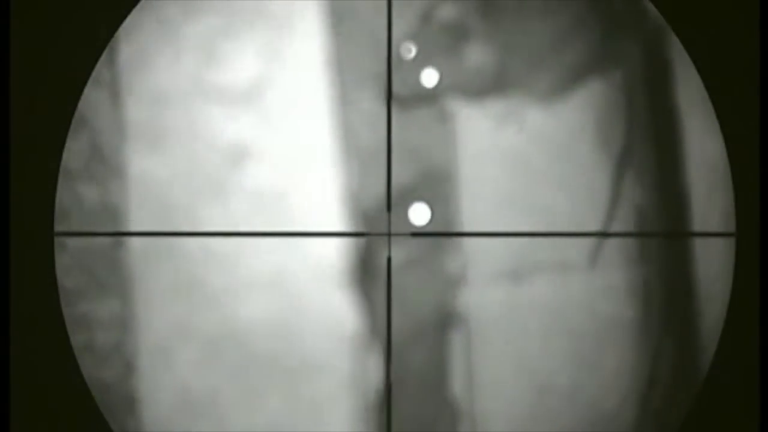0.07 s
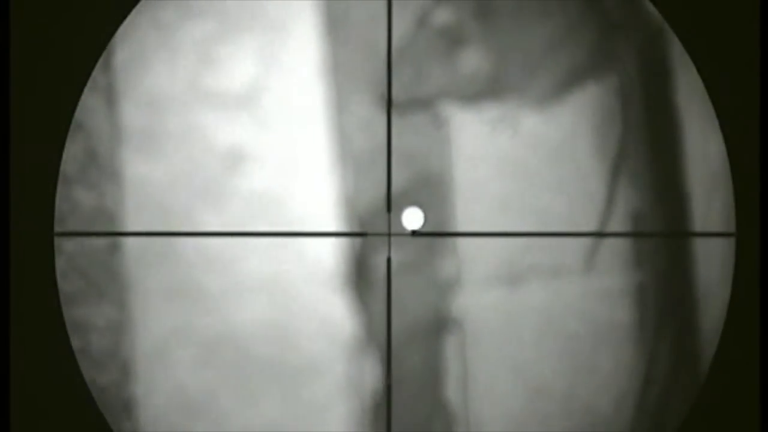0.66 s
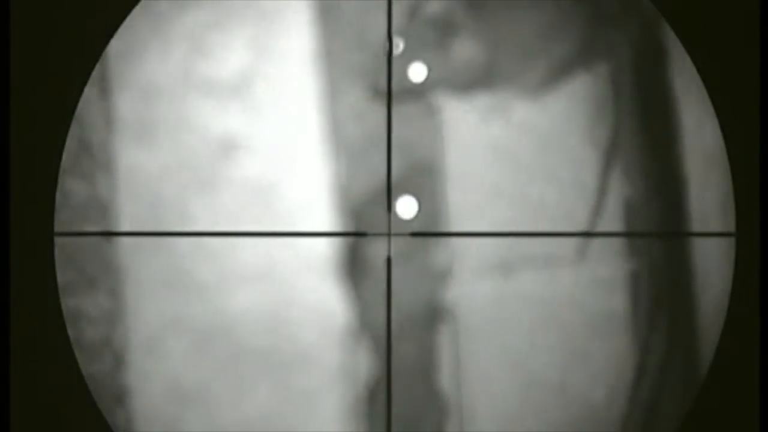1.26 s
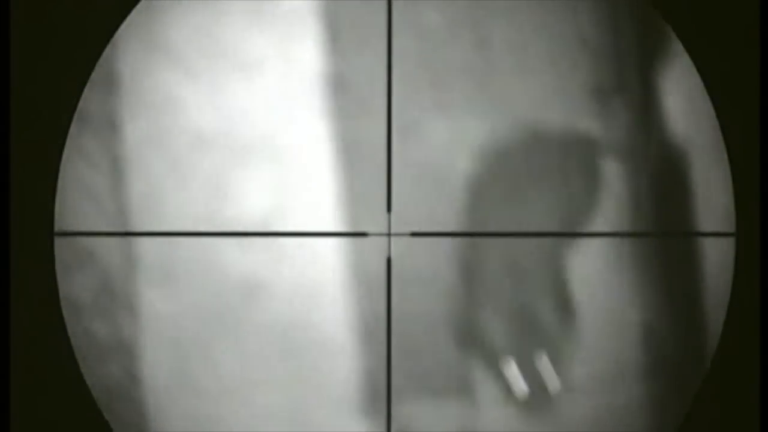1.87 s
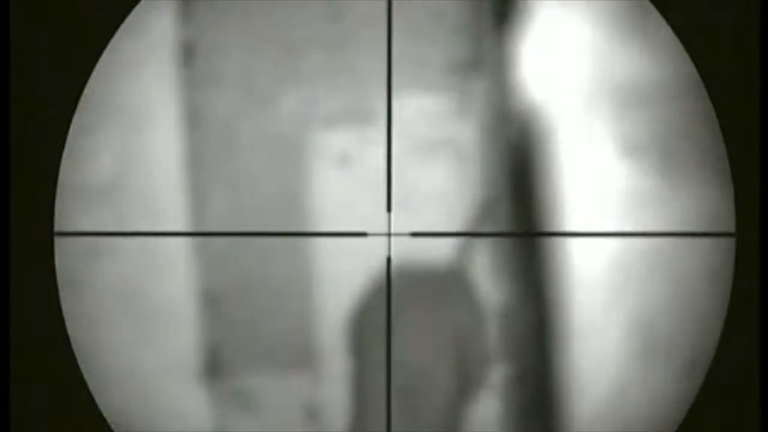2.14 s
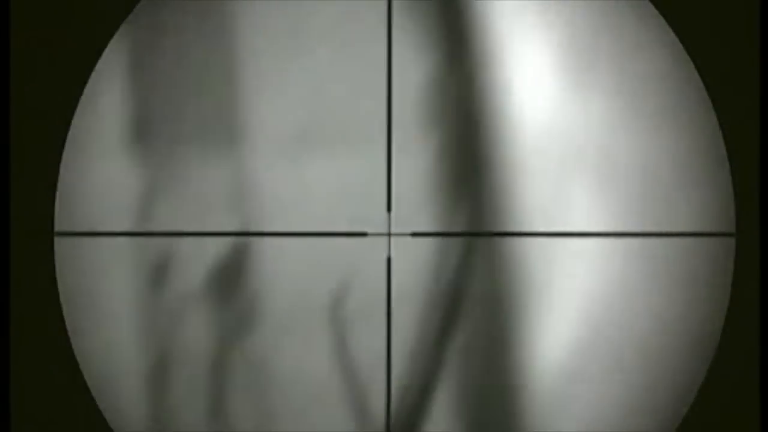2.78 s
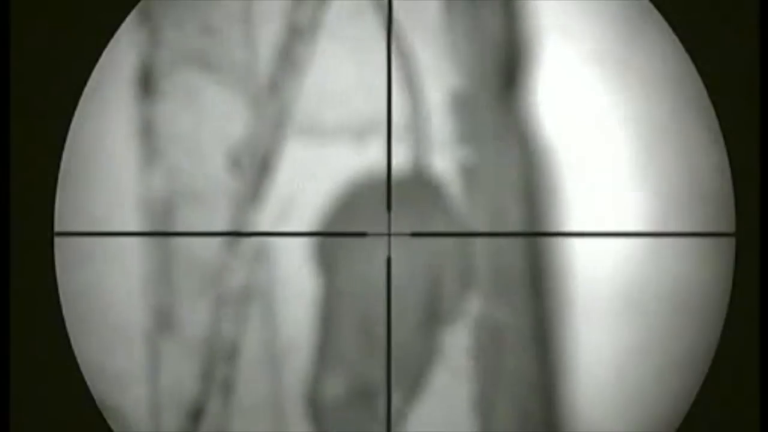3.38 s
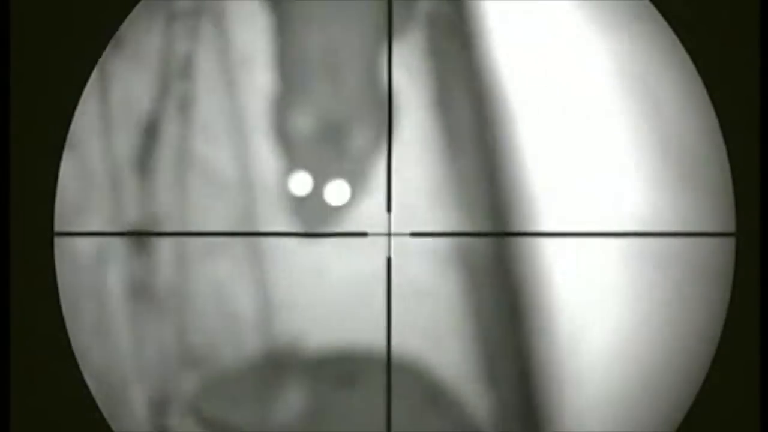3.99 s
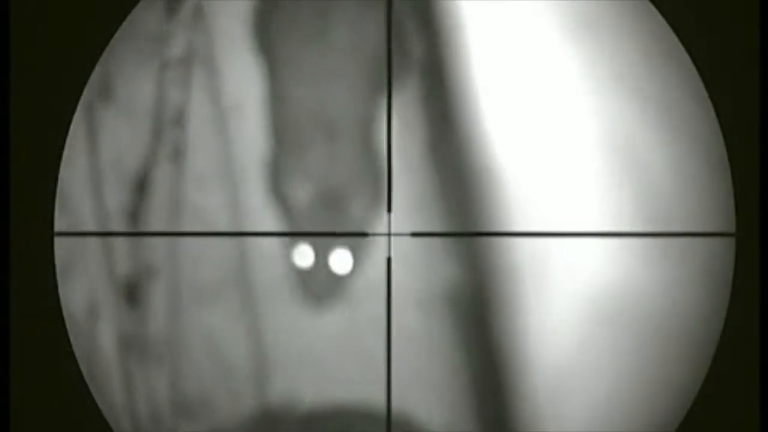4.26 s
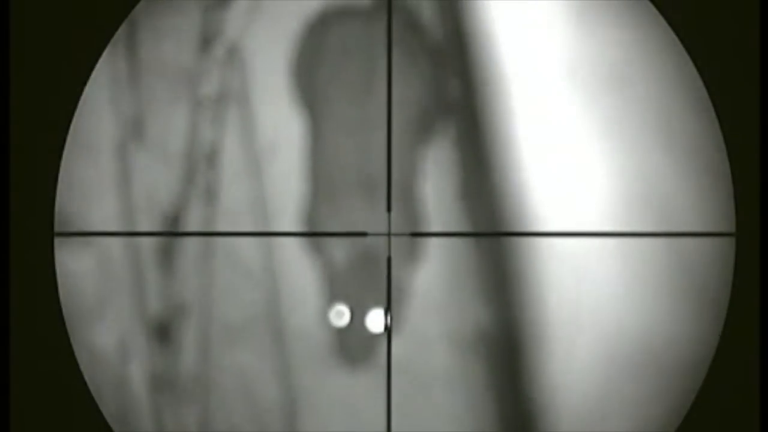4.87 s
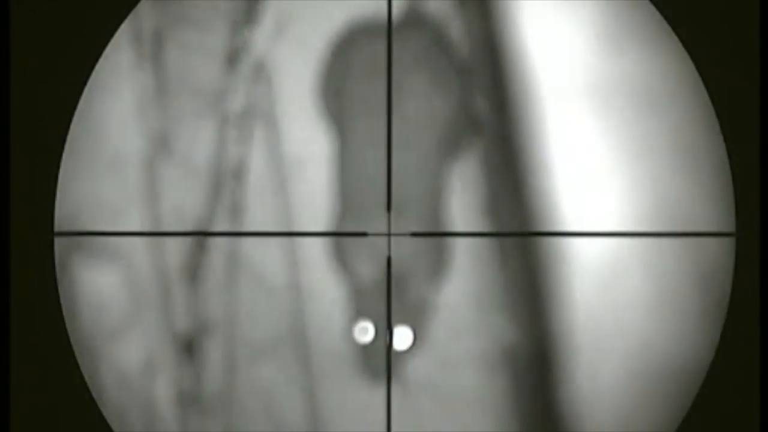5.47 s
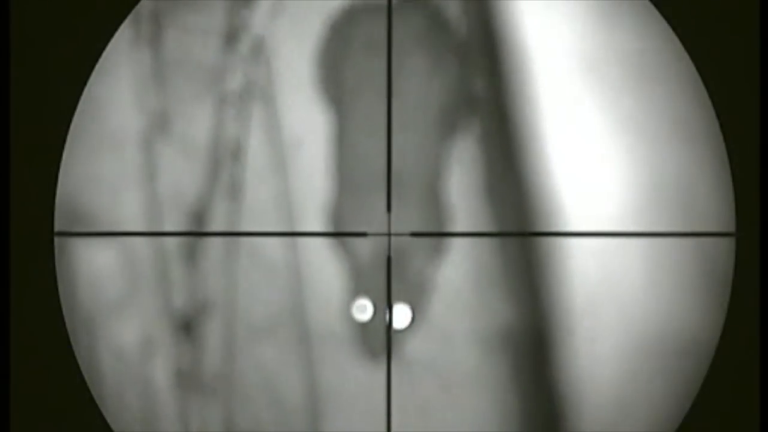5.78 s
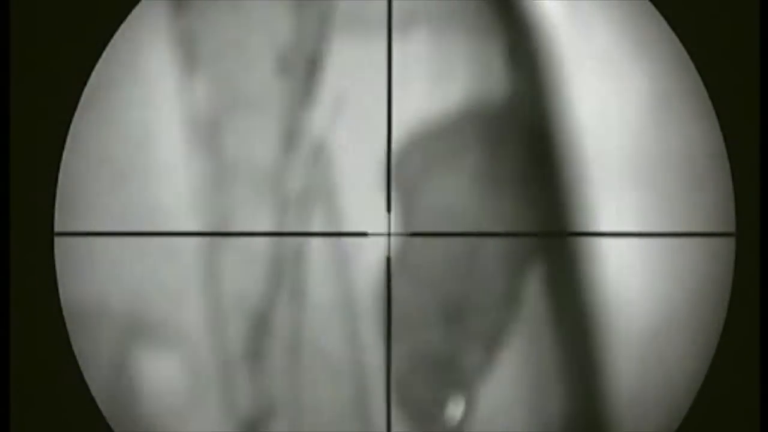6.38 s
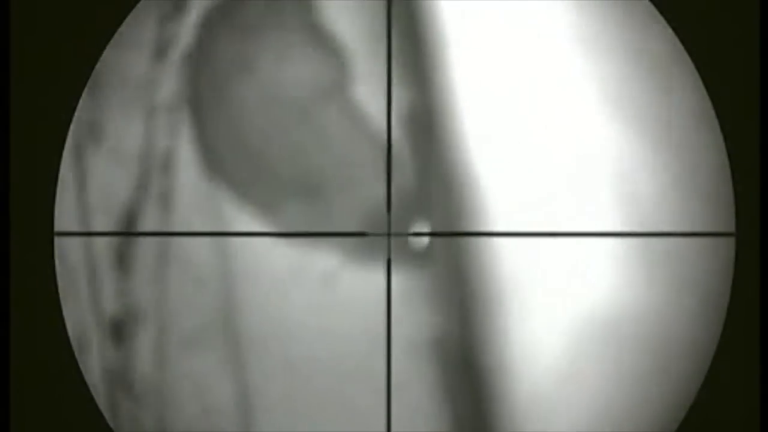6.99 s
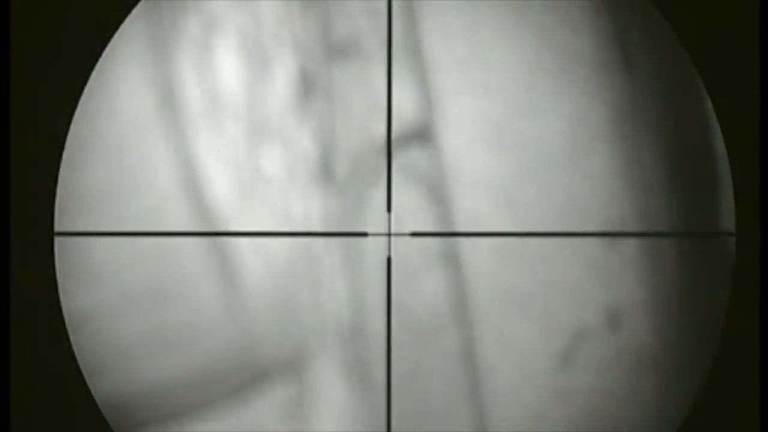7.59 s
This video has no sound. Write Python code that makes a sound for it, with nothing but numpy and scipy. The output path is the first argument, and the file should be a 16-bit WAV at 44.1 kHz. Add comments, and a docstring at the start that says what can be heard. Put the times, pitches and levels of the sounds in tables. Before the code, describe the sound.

A spring air rifle fires twice with a loud metallic clang, each shot followed by lighter ringing knocks and scrapes of cocking and reloading.

```python
"""Spring air rifle in a farm shed

Two shots, each followed by cocking and reloading. The piston slams home and sets the spring, tube
and stock ringing; then lever and breech knock, loose parts tick and steel slides on steel.
The microphone of a night-sight camera rides on the gun: it overloads on the hard blows and
picks up the rumble of the hands and the camera's own buzz."""
import sys
import numpy as np
from scipy import signal
from scipy.fft import rfft, irfft
from scipy.io import wavfile

SR = 44100
rng = np.random.default_rng(int(sys.argv[2]) if len(sys.argv) > 2 else 0)


def master_out(mix):
    """Clip the mix to full scale and print it as 16-bit PCM to the path in sys.argv[1]."""
    frames = np.transpose(np.atleast_2d(mix))
    ceiling = np.clip(frames, -1, 1)
    pcm = np.round(ceiling * 32767).astype(np.int16)
    wavfile.write(sys.argv[1], SR, pcm)


N = 341554
TIME = np.arange(N) / SR
HIT_TIME = TIME[:int(1.2 * SR)]  # seconds into one hit and its ring-out


# compression tube, rung by every blow: pitch_hz, level_db, t60_s
TUBE_MODES = [(845.8, -1.5, 0.19), (849, -31, 0.48), (455, -39.5, .7), (770, -32.5, 0.37), (1190, -32, .32),
              (1358, -19.5, .09), (1730, -32, 0.21), (2470, -40.5, 0.11), (3013, -12, 0.038)]
# mainspring and barrel: pitch_hz, level_db, t60_s
SPRING_MODES = [(302, -5.5, 0.44), (397.6, -5.5, 1), (550, -9.5, 0.33), (627, -13, 0.29), (775, -16, 0.95),
                (926, -22.5, .46), (1150, -14, 0.81), (1200, -13, 0.67), (1260, -27, 0.46),
                (1400, -10.5, 0.56), (1583, -16, .7), (1714, -16.5, 1), (1800, -22, 0.67), (2153, -1, .43),
                (2880, 2.5, .36), (4360, 2, 0.24), (5100, -28.5, 0.5), (5730, -22.5, .26)]
# stock and sight tube, rung by recoil: pitch_hz, level_db, t60_s
STOCK_MODES = [(166, -16.5, 0.2566), (264, -7, 0.11), (284, -8, 0.15), (480, 1, .08), (545, 8.5, 0.069)]
# low body of a shot: frequency_hz, level_db
THUD_SPECTRUM = [(25, -6.5), (60, -1.5), (110, -7.5), (170, -1), (280, 5), (550, 0.5), (900, -13),
                 (3000, -45), (16000, -66)]
# piston slams: start_s, blow_db, blow_t60_s, tube_db, spring_db, stock_db, last_bounce_delay_s
PISTON_SLAMS = [(1.2311, 10, .085, 1, -25, -26.5, .03), (5.7786, 11, 0.087, 3, -28.5, -18.5, .04)]

def shots(tilt_db=-3, slam_hz=1420, slam_width_hz=300, slam_lift_db=9,
          rebound_s=.02, rebound_db=-8, rebound_t60=.032, rebound_tilt_db=4,
          thud_db=-19, thud_t60=.25, recoil_db=-7.5, recoil_s=.012, puff_db=-39, puff_t60=.24):
    """The piston slams home and bounces twice; the gun rings on as the muzzle puff dies in the shed."""
    out = np.zeros(N)
    clack = [(slam_hz, slam_width_hz, slam_lift_db)]
    for start, db, t60, tube_db, spring_db, stock_db, bounce_s in PISTON_SLAMS:
        slam = undb(db) * chatter(t60, tilt_db, clack, tail_db=-47.5, tail_t60=.14)
        thud = undb(thud_db) * through(burst(thud_t60), response(THUD_SPECTRUM))
        puff = undb(puff_db) * burst(puff_t60)
        # recoil shoves the microphone diaphragm one way
        recoil = -undb(recoil_db) * HIT_TIME / recoil_s * np.exp(1 - HIT_TIME / recoil_s)
        rings = undb(tube_db) * ring(TUBE_MODES) + undb(spring_db) * ring(SPRING_MODES)
        add(out, start, slam + thud + puff + recoil + rings)
        add(out, start + rebound_s, undb(db + rebound_db) * chatter(rebound_t60, rebound_tilt_db))
        # the last bounce is soft and only reaches the low modes
        add(out, start + bounce_s, undb(stock_db) * ring(STOCK_MODES) * (1 - fade(.0036)))
    return out


# broad tone of steel on steel: frequency_hz, level_db
CONTACT_SPECTRUM = [(30, -15), (120, -13), (300, -10), (650, -8), (1000, -3.5), (1500, -4), (2500, -6),
                    (3600, -19.5), (6000, -26), (10000, -28.5), (16000, -35.5)]
# damped resonances of the action and sight mount: pitch_hz, width_hz, lift_db
ACTION_RESONANCES = [(448, 240, 13.5), (842.5, 48, 19.5), (1163, 100, 8.5), (1342, 250, 8.5),
                     (1629, 150, 9), (1937, 58, 4.5), (2234.6, 140, 12), (2637, 170, 6.5), (3025, 210, 17),
                     (3717, 160, 9), (4304, 580, 14.5), (5160, 510, 12.5), (6730, 200, 8), (7930, 430, 8.5)]

def chatter(t60, tilt_db, clack=(), rise_s=.001, crack_hz=4500, crack_db=3, crack_t60_ratio=.65,
            tail_db=-42, tail_t60=.23):
    """Steel faces chatter and ring the action; the bright crack dies first, a faint rattle lingers."""
    force = rng.standard_normal(len(HIT_TIME)) * (1 - np.exp(-(HIT_TIME / rise_s) ** 2))
    body = signal.sosfiltfilt(signal.butter(2, crack_hz, fs=SR, output="sos"), force)
    crack = undb(crack_db) * (force - body) * fade(crack_t60_ratio * t60)
    rattle = undb(tail_db) * force * fade(tail_t60)
    action = response(CONTACT_SPECTRUM, [*ACTION_RESONANCES, *clack], tilt_db)
    return through(body * fade(t60) + crack + rattle, action)


# ping of the latch: pitch_hz, level_db, t60_s
LATCH_MODES = [(4599, -6.5, 0.062), (4362, -4.5, 0.22), (4360, -10.5, 0.16), (3350, -5, 0.049)]
# voice of each part: blow_t60_s, tilt_db_per_octave, clack_hz, spring_db, latch_db
# (both levels are relative to the blow)
PART_VOICES = { "release": (0.0311, 1, 3028.5, -56, -52), "stop": (0.0333, 2.3, 1599, -51, -45),
               "pawl": (0.04, 6, 4290.5, -43, -20), "sear": (0.03, 8, 1550.5, -51.5, -23.5),
               "lock": (0.0306, 5, 1280, -45, -32), "rattle": (0.0531, -.5, 1371, -50.5, -49),
               "bolt": (0.07, 1, 3061, -57, -52.5), "breech": (-0.0023, -9.5, 1287, -66.5, -55)}
# release, stop, pawl, sear, lock, then loading and closing: start_s, part, blow_db, tube_db
RELOAD_KNOCKS = [(2.109, "release", -12.5, -34.5), (2.114, "release", -11.5, -44.5),
                 (2.1472, "stop", .5, -25), (2.3841, "pawl", -16.5, -35.5), (2.398, "sear", -6.5, -18.5),
                 (2.62, "lock", -2, -8.5), (2.756, "rattle", -26, -37), (2.779, "rattle", -17.5, -50),
                 (2.814, "bolt", -24, -30.5), (2.906, "rattle", -31.5, -50),
                 (2.9129, "rattle", -24.5, -40.5), (3.163, "bolt", -16, -26), (3.167, "breech", -6, -14),
                 (6.474, "release", -14.5, -17.5), (6.5419, "stop", 1, -22.5), (6.7287, "pawl", -18.5, -44),
                 (6.743, "sear", -5, -17.5), (6.971, "lock", -3.5, -10.5), (7.098, "rattle", -24, -49),
                 (7.112, "bolt", -17, -35), (7.1507, "rattle", -22.5, -27), (7.204, "rattle", -23.5, -33.5),
                 (7.255, "bolt", -15.5, -18.5)]

def knocks(clack_width_hz=260, clack_db=8, rise_s=.00064, softening=.36, tail_db=-43):
    """Cocking and loading: each part has its own clack and its own mix of tube, spring and latch ring."""
    out = np.zeros(N)
    for start, part, db, tube_db in RELOAD_KNOCKS:
        t60, tilt_db, clack_hz, spring_db, latch_db = PART_VOICES[part]
        attack_s = rise_s * undb(-softening * db)  # hard blows bite at once, light ones build up
        blow = chatter(t60, tilt_db, [(clack_hz, clack_width_hz, clack_db)], attack_s, tail_db=tail_db)
        tube = undb(tube_db) * ring(TUBE_MODES)
        spring = undb(db + spring_db) * ring(SPRING_MODES)
        latch = undb(db + latch_db) * ring(LATCH_MODES)
        add(out, start, undb(db) * blow + (tube + spring + latch) * (1 - fade(.015)))
    return out


# loose parts under the hand: start_s, level_db, tilt_db_per_octave, tube_db
LOOSE_TICKS = [(1.6611, -33, -8, -52.5), (1.6846, -23, -8, -43), (1.7898, -35.5, 5, -42),
               (1.8123, -23.5, -10, -55), (1.8225, -26.5, 2.5, -51), (1.8835, -34.5, -3, -49),
               (2.2523, -30, -5.5, -52.5), (2.2872, -26, -4.5, -37.5), (2.3744, -26, 3, -40.5),
               (2.5866, -27.5, 9, -42.5), (3.3048, -39, -3.5, -55), (6.097, -26, -3.5, -40),
               (6.1181, -28, -4.5, -38.5), (6.1606, -32, -4.5, -32.5), (6.1943, -42.5, 7, -37),
               (6.2984, -39.5, 0, -40), (6.9373, -31, 9, -44), (7.0454, -27.5, 2, -42)]

def ticks(t60=.03, ring_tilt_db=-4, ring_rise_s=.014):
    """Loose parts tick lightly, waking mostly the low modes of the tube."""
    out = np.zeros(N)
    for start, db, tilt_db, tube_db in LOOSE_TICKS:
        tube = ring(TUBE_MODES, ring_tilt_db) * (1 - fade(ring_rise_s))
        tick = chatter(t60, tilt_db, rise_s=.0022)
        add(out, start, undb(db) * tick + undb(tube_db) * tube)
    return out


def slide(slips_per_s=4000, spread_db=3, catch_rate=90, catch_db=4.5, tilt_db=-3, sharpness=1.2,
          tube_db=-5, spring_db=-23, sheen_hz=6950, sheen_width_hz=350, sheen_db=11):
    """Sliding steel catches and slips: uneven runs of tiny clicks into the action, tube and spring."""
    slips = (rng.random(N) < slips_per_s / SR) * rng.standard_normal(N)
    slips *= undb(spread_db * np.minimum(rng.exponential(size=N), 4))  # a few stand out
    slips *= undb(catch_db * wander(catch_rate))
    force = slips / slips.std() * pressure()
    resonances = [(hz, width, sharpness * lift) for hz, width, lift in ACTION_RESONANCES]
    sheen = (sheen_hz, sheen_width_hz, sheen_db)
    rasp = through(force, response(CONTACT_SPECTRUM, [*resonances, sheen], tilt_db))
    tube = through(force, unit_energy(ring(TUBE_MODES, tilt_db=-5)))
    spring = through(rasp, unit_energy(ring(SPRING_MODES)))
    return rasp + undb(tube_db) * tube + undb(spring_db) * spring


# firm strokes of metal on metal: start_s, length_s, midway_level_db, swell_db
SLIDE_STROKES = [(1.68, 0.16, -51, -4), (1.87, 0.069, -54, -4), (2.03, 0.037, -51, 4), (2.2, 0.23, -44, 9),
                 (2.62, 0.13, -47, -10), (3.34, 0.299, -60, -9.5), (6.115, .06, -45, -3),
                 (6.22, .26, -55.5, 8), (6.57, 0.19, -41, 4.5), (6.96, 0.062, -41, -6.5),
                 (7.48, 0.12, -56, -5.5)]
# the hands work the action: start_s, length_s
RELOAD_SPANS = [(1.543, 2.15), (6.049, 1.9)]

def pressure(attack_s=.012, release_s=.018, run_in_db=-34.5, run_in_s=.012, rub_db=-67.5):
    """How hard the steel is rubbed: firm strokes over the light rubbing of a whole reload."""
    firm = sum(undb(db) * gesture(start, length, attack_s, release_s, swell_db)
               for start, length, db, swell_db in SLIDE_STROKES)
    # each part scrapes along just before it strikes
    run_in = np.exp(-HIT_TIME[::-1] / run_in_s)
    for strike_s, _, blow_db, _ in RELOAD_KNOCKS:
        add(firm, strike_s - HIT_TIME[-1], undb(blow_db + run_in_db) * run_in)
    light = sum(undb(rub_db) * gesture(start, length, attack_s, release_s)
                for start, length in RELOAD_SPANS)
    return np.hypot(firm, light)


# handling rumble: frequency_hz, level_db
RUMBLE_SPECTRUM = [(20, -3.5), (50, 2.5), (100, -2.5), (200, -8), (400, -13.5), (700, -27.5), (1500, -39),
                   (16000, -68.5)]
# the gun shifts in the hands: start_s, length_s, level_db
GRIP_SHIFTS = [(1.76, .08, -54), (2.72, 0.46, -58.5), (4.17, 0.12, -64.5), (4.4, 0.71, -68),
               (5.855, 0.41, -56.5), (6.9, 0.12, -56)]

def hands(hold_db=-67, ease_s=.18):
    """Dull rumble of the grip on the stock, louder whenever the gun shifts."""
    shifts = sum(undb(db) * gesture(start, length, ease_s, ease_s) for start, length, db in GRIP_SHIFTS)
    rumble = through(rng.standard_normal(N), response(RUMBLE_SPECTRUM))
    return rumble * np.hypot(undb(hold_db), shifts)


# amplifier hiss: frequency_hz, level_db
HISS_SPECTRUM = [(30, 8), (400, 4), (1100, 5.5), (1700, 10.5), (2600, 6.5), (5000, 6.5), (10000, 4.5),
                 (16000, -2)]

def camera(buzz_hz=50, pulse_db=-53, pulse_s=.00085, edge_s=.00009, step_db=-76,
           whine_hz=15625, whine_db=-67, hiss_db=-79):
    """The picture signal leaks in as a buzz, a pulse and a step each field, with line whine and hiss."""
    field_phase = (TIME * buzz_hz + 1.1) % 1 - .5
    pulse = (1 + np.tanh((pulse_s / 2 - np.abs(field_phase) / buzz_hz) / edge_s)) / 2
    step = -np.tanh(20 * np.sin(2 * np.pi * field_phase))
    whine = np.sin(2 * np.pi * whine_hz * TIME)
    hiss = through(rng.standard_normal(N), response(HISS_SPECTRUM))
    return undb(pulse_db) * pulse + undb(step_db) * step + undb(whine_db) * whine + undb(hiss_db) * hiss


def ring(modes, tilt_db=0, detune=.0013):
    """Struck modes, tilted about 840 Hz; each blow catches them at a new phase and a hair off pitch."""
    out = np.zeros(len(HIT_TIME))
    for hz, db, t60 in modes:
        t = HIT_TIME[:int(1.3 * t60 * SR)]
        envelope = undb(db + tilt_db * np.log2(hz / 840)) * np.exp(-np.log(1000) * t / t60)
        pitch_hz = hz * (1 + detune * rng.standard_normal())
        out[:len(t)] += envelope * np.sin(2 * np.pi * (pitch_hz * t + rng.random()))
    return out


def response(spectrum, resonances=(), tilt_db=0):
    """Impulse response of a broad spectrum, lifted at resonances and tilted per octave about 2 kHz."""
    freq = np.maximum(np.arange(4097) * SR / 8192, 1)
    hz, db = np.transpose(spectrum)
    db = np.interp(np.log(freq), np.log(hz), db)
    db += sum(lift / (1 + (2 * (freq - centre) / width) ** 2) for centre, width, lift in resonances)
    db += tilt_db * np.log2(np.maximum(freq, 500) / 2000)
    # minimum phase: nothing sounds ahead of the hit
    cepstrum = irfft(np.log(undb(db)))
    half = len(cepstrum) // 2
    folded = np.r_[cepstrum[0], 2 * cepstrum[1:half], np.zeros(half)]
    return unit_energy(irfft(np.exp(rfft(folded)))[:SR // 10])


def gesture(start, length, attack_s, release_s, swell_db=0):
    """Gain of one hand movement: it rises, swells or eases evenly, and dies away."""
    end = start + length
    times = [start - np.log(1e5) * attack_s, start, end, end + np.log(1e5) * release_s]
    gains = [1e-5, undb(-swell_db / 2), undb(swell_db / 2), 1e-5]
    return np.exp(np.interp(TIME, times, np.log(gains)))


def wander(rate):
    """Random drift with a spread near 1, turning rate times a second."""
    return np.interp(TIME * rate, np.arange(4096), rng.standard_normal(4096))


def burst(t60):
    """A dying burst of white noise."""
    return rng.standard_normal(len(HIT_TIME)) * fade(t60)


def fade(t60):
    """Decay by 60 dB in t60 seconds, a millisecond at the shortest."""
    return np.exp(-np.log(1000) * HIT_TIME / max(t60, 1e-3))


def through(force, impulse):
    """Pass a force through an impulse response."""
    return signal.fftconvolve(force, impulse)[:len(force)]


def unit_energy(impulse):
    """Scale an impulse response to an energy of 1."""
    return impulse / np.linalg.norm(impulse)


def add(track, start_s, sound):
    """Mix a sound into the track."""
    start = int(start_s * SR)
    track[start:start + len(sound)] += sound[:N - start]


def undb(db):
    """Decibels to gain."""
    return 10 ** (np.asarray(db) / 20)


def scene():
    """One microphone on the gun feeds both channels."""
    return np.tile(shots() + knocks() + ticks() + slide() + hands() + camera(), (2, 1))


def record(dry, rail=.27, lean=.24, bias_shift=.47, bias_hz=20, coupling_hz=8,
           treble_hz=14000, hiss_db=-83, top_hz=15750):
    """The preamplifier clips, sooner upward than downward, and overloads push its bias down."""
    overload = np.clip(np.abs(dry) - rail, 0, 2)
    drive = dry - bias_shift * signal.sosfilt(signal.butter(2, bias_hz, fs=SR, output="sos"), overload)
    limit = rail * (1 - lean * np.sign(drive))
    clipped = drive / (1 + (drive / limit) ** 4) ** (1 / 4)
    # the coupling capacitor lets the wave drift back to centre
    out = signal.sosfilt(signal.butter(1, coupling_hz, "high", fs=SR, output="sos"), clipped)
    out = signal.sosfilt(signal.butter(2, treble_hz, fs=SR, output="sos"), out)
    out = out + undb(hiss_db) * rng.standard_normal(dry.shape)
    return signal.sosfilt(signal.ellip(8, .2, 70, top_hz, fs=SR, output="sos"), out)


dry = scene()
out = record(dry)
master_out(out)
```